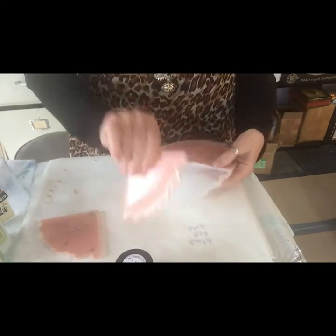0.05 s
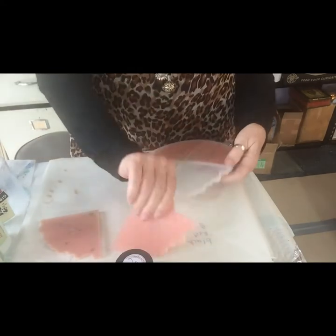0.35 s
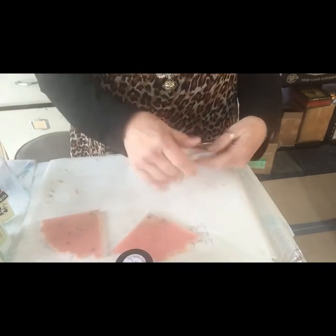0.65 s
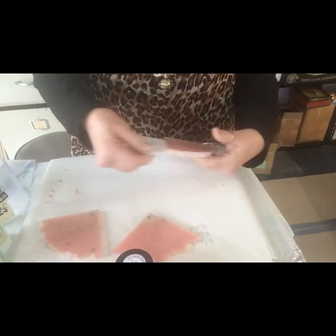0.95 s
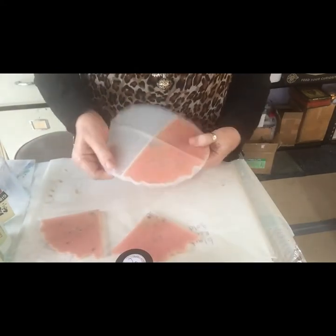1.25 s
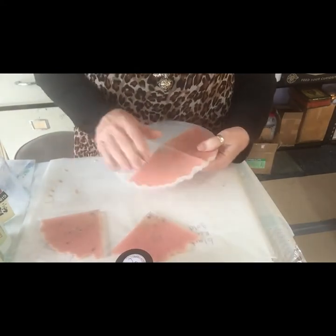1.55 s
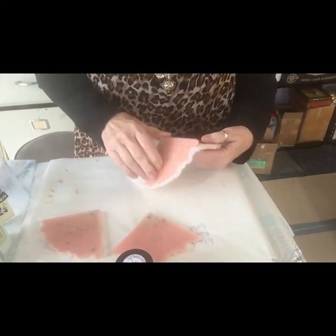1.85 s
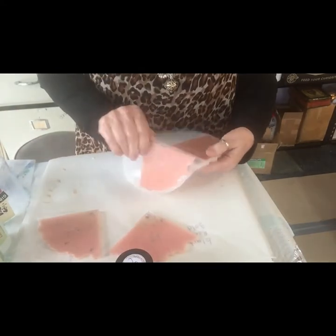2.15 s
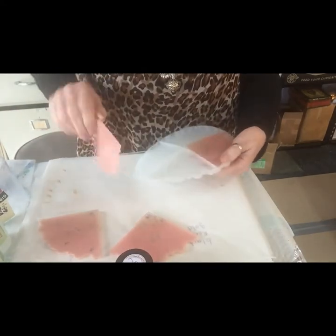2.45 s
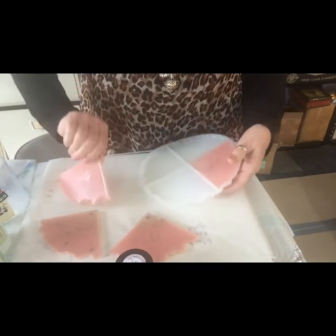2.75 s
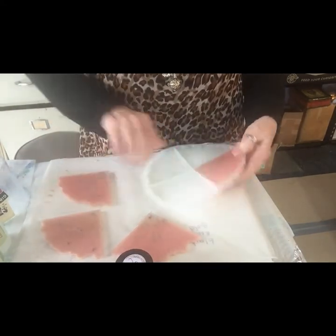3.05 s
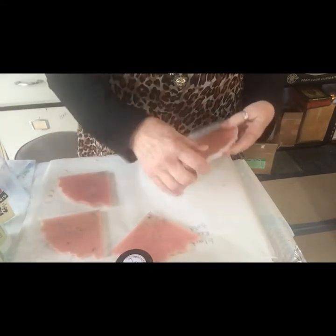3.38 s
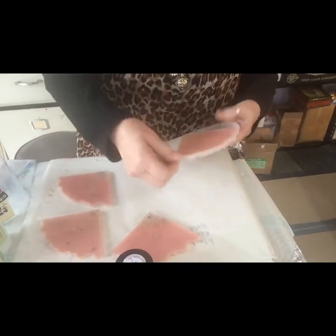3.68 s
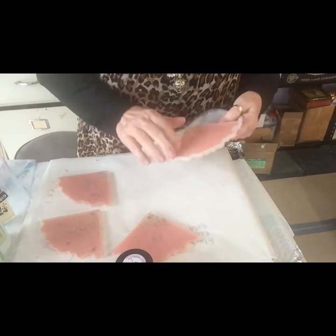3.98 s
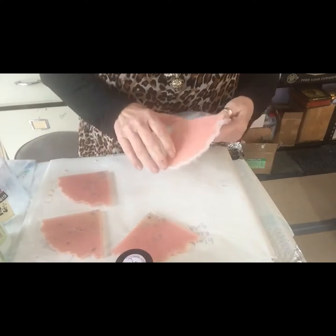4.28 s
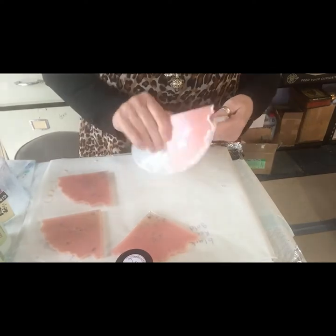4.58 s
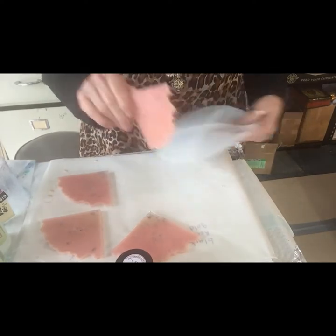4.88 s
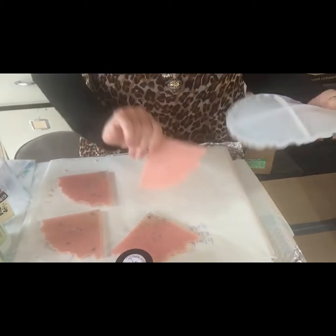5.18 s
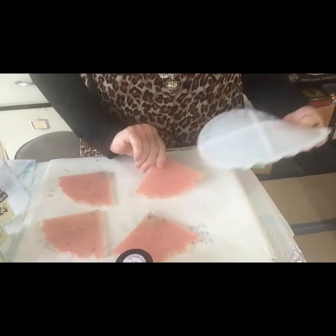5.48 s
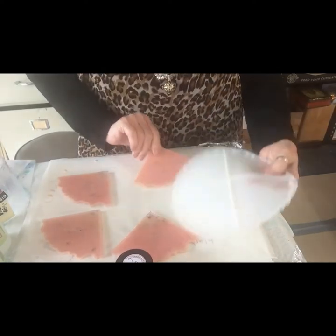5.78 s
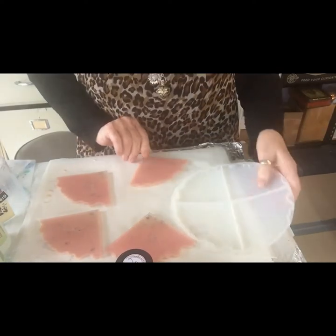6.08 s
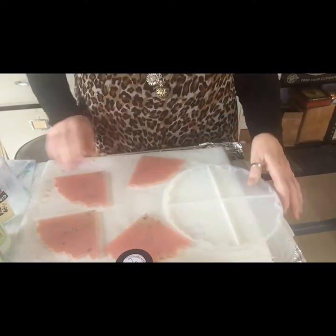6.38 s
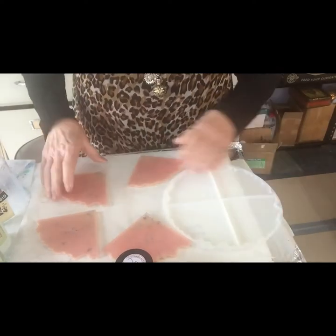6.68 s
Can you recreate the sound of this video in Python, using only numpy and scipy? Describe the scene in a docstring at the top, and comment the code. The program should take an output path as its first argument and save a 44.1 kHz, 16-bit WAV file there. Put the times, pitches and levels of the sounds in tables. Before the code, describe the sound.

A thin hard resin piece drops onto a plastic-covered table with one sharp clack. A silicone mold is flexed with soft crackles and small clicks, and a second piece lands with a lighter clatter. After more faint peeling, a third is set down with a dull knock and slid into place, scraping and clicking. The sounds are close, in a small quiet room with a faint low rumble and hiss.

```python
"""Thin cured resin pieces knock and clack onto a plastic-covered table in a small room.
Each impact excites the damped modes of piece and table top, again and again as the piece rocks to rest.
The silicone mold they are peeled from crackles by stick-slip friction and flops as it lets go.
Slid into place, a piece scrapes, drives the table to a drone and rasps where its edge catches.
A low rumble and a faint hiss lie underneath."""
import sys
import numpy as np
from scipy import signal
from scipy.fft import rfft, irfft, next_fast_len
from scipy.io import wavfile
from scipy.ndimage import map_coordinates

SR = 44100
rng = np.random.default_rng(int(sys.argv[2]) if len(sys.argv) > 2 else 0)


def materialize(psi):
    """Save the field psi as 16-bit PCM at rate SR to the path in sys.argv[1].

    A 1-D psi becomes a single channel; in a 2-D psi each row is a channel.
    """
    bounded = np.clip(np.atleast_2d(psi).T, -1, 1)
    quanta = np.round(bounded * 32767).astype(np.int16)
    wavfile.write(sys.argv[1], SR, quanta)


N = 305613
TIME = np.arange(N) / SR
LIFE = np.arange(SR // 3) / SR  # time since a contact [s]

# course of the room's rumble: (time [s], relative level [dB])
RUMBLE_LEVELS = [(0.6, -77), (2.4, -72.5), (2.49, -69), (6.05, -70.5), (6.35, -76), (6.93, -70)]
# spectrum of the rumble: (frequency [Hz], relative density [dB])
RUMBLE_SPECTRUM = [(15, -41), (25, -3.5), (67, -1), (156, -7), (299, -21), (335, -22), (500, -35),
                   (650, -57.5), (1100, -120)]
# spectrum of the hiss: (frequency [Hz], relative density [dB])
HISS_SPECTRUM = [(150, -26), (250, -6.5), (436, -11), (510, -12), (698, -11), (1450, -13.5), (2620, -16),
                 (2860, -18.5), (5350, -20), (9660, -20.5), (16000, -31.5)]
# strokes of peeling or rubbing: (time [s], duration [s], treble level [dB], body re treble [dB])
RUB_STROKES = [(.02, 0.057, -69.5, 9), (.182, 0.036, -61.5, 6.5), (.284, .11, -63.5, -7),
               (0.391, .04, -51.5, -6.5), (0.817, .125, -58, 1.5), (2.003, .04, -62.5, 0),
               (2.134, .065, -68.5, 0), (2.235, 0.064, -60.5, -1.5), (2.352, .04, -71, 1.5),
               (2.73, .15, -63.5, 7.5), (2.893, .045, -44, 1), (2.96, .15, -58.5, 2.5),
               (3.155, 0.072, -60.5, 2.5), (3.688, .06, -57.5, -1.5), (4.395, .03, -69.5, 3.5),
               (4.66, .1, -72.5, 4), (4.761, .06, -62, 0), (5.671, .15, -74, 9.5), (5.837, .04, -58.5, 6),
               (5.885, .04, -54, 2), (5.926, .016, -45, 2), (5.96, .046, -46.5, -1.5),
               (6.009, .055, -53.5, 2), (6.12, 0.097, -65, 4.5), (6.236, .07, -55, -1)]
# resin rubbing on silicone or plastic: (frequency [Hz], relative density [dB])
SCRAPE_SPECTRUM = [(120, -42.5), (200, -7), (322, -7), (432, -13), (491, -10.5), (590, -13), (780, -9),
                   (950, -12), (1130, -5.5), (1500, -5), (2860, -10.5), (3070, -10.5), (7540, -14),
                   (11100, -10), (16000, -38)]
# clicks of resin edges, nails and parting silicone:
# (time [s], level [dB], body re middle band [dB], treble re middle band [dB], decay t60 [s])
CLICK_EVENTS = [(.0698, -57, -18, -3, 0.011), (0.167, -51, 3, 10, 0.014), (0.1723, -46.5, 11, -40, 0.026),
                (0.3052, -50.5, 7, 9.5, 0.012), (0.388, -53.5, -4, 9, 0.013), (0.761, -45, 6, 1.5, 0.023),
                (0.821, -51, 0, -2, 0.027), (0.8566, -47.5, 3, -13, 0.0068), (0.8857, -45, -2, -3.5, 0.019),
                (.9195, -49, -16, -7, 0.0071), (0.9323, -51.5, 4, -3, 0.012), (1.091, -59, 2, 4, 0.006),
                (2.026, -55.5, 1.5, -1, 0.0073), (2.142, -62.5, 4.5, -7, 0.014),
                (2.229, -62.5, -.5, 1.5, 0.02), (2.2646, -51, 6, 2, 0.03), (2.351, -58.5, 6.5, -6, 0.027),
                (2.7866, -62.5, -13, 12, 0.011), (2.834, -50, 4, 3, 0.048), (3.023, -47.5, 1, -4, 0.015),
                (3.053, -51, 5, -2, 0.0089), (3.107, -56.5, 2, -8, 0.028), (3.133, -51, 1.5, -14, 0.028),
                (3.1518, -45.5, 1, -1, 0.017), (3.184, -54.5, 2.5, 0.5, 0.0094),
                (3.6946, -49, -5, -1, 0.023), (3.7, -55, 4, -2, 0.015), (3.743, -60.5, 0, -3, 0.013),
                (4.014, -65, -15.5, -12, 0.01), (4.361, -68.5, 0.5, 4, 0.015),
                (4.787, -51.5, 2.5, -13, 0.0067), (4.7918, -50.5, 0, -3.5, 0.01),
                (4.835, -56.5, -22.5, 19, 0.0042), (5.773, -48.5, 9, -12, .02),
                (5.846, -49, -6.5, -18, 0.022), (5.8771, -39.5, 1.5, -11.5, 0.02),
                (5.929, -42, 3.5, 5, 0.031), (5.988, -43.5, -7, -2, .018), (6.0413, -51, -7, 3, 0.01),
                (6.05, -45, 2, -9.5, 0.02), (6.195, -54, -3, 7, 0.012), (6.2262, -49.5, -6, -19, 0.015),
                (6.2383, -41, -3, 18.5, 0.0078), (6.3235, -50, 1, -19.5, 0.009),
                (6.727, -54, -2.5, -4, 0.024)]
# thuds of the mold, of fingers and of a piece falling flat: (time [s], level [dB], frequency [Hz])
FLOP_EVENTS = [(0.133, -56.5, 340), (0.279, -57.5, 458), (0.423, -39, 189.8), (0.425, -39, 85.1),
               (0.764, -47.5, 295), (1.352, -64.5, 901), (1.457, -62, 803.6), (2.001, -62.5, 420),
               (2.717, -46, 290), (2.9, -47, 240.7), (3.693, -50.5, 443), (4.747, -61.5, 533),
               (4.791, -58, 260), (4.807, -53.5, 136.6), (5.597, -52.5, 290), (6.052, -50, 360)]
# a piece dragged over the table: (time [s], duration [s], level [dB])
DRAG_STROKES = [(.18, 0.11, -62.5), (.345, 0.096, -52), (5.32, 0.02, -47.5), (5.42, 0.18, -63.5),
                (5.6, 0.017, -56.5), (5.68, 0.12, -57), (6.04, 0.044, -66)]
# the table under a sliding piece: (frequency [Hz], relative density [dB])
DRONE_SPECTRUM = [(100, -25.5), (200, -17), (330, 0.5), (500, -4.5), (670, -11), (850, -1), (1000, -15.5),
                  (1750, -17), (2600, -22), (4600, -29), (8000, -60.5)]
# a piece meets the table: (time [s], resin level [dB], table level [dB], contact cut-off [Hz],
# pitch of the piece [ratio], scuff t60 [s], rocking time [s], loss per corner [dB])
LANDINGS = [(.332, -49.5, -46.5, 1950, 0.7, 0.0078, 0.033, 2),
            (0.411, -46.5, -44, 4060, 0.65, 0.015, 0.0043, 4.5),
            (0.4238, -15, -28, 14300, 0.99, 0.0066, 0.004, 8),
            (2.712, -32.5, -39.5, 1750, .595, 0.016, 0.03, 13.5),
            (2.883, -46, -49, 3290, 0.89, 0.026, 0.0052, 8),
            (2.893, -31.5, -63, 15000, 0.53, 0.086, 0.0067, 7),
            (2.897, -30, -40.5, 9300, 0.7, 0.013, .003, 7.5),
            (2.924, -43.5, -45, 1690, 0.65, 0.031, 0.0051, 12),
            (5.3035, -35.5, -34, 2190, .845, 0.013, 0.0036, 6)]
# spectrum of a bare hard contact: (frequency [Hz], relative density [dB])
CRACK_SPECTRUM = [(100, -14), (500, -2.5), (800, -3), (1100, -8), (2100, 3), (3100, -3), (4000, -2),
                  (5500, 1), (7300, -4.5), (8800, 1.5), (12200, -5), (13500, -15.5), (16000, -19.5)]
# modes of a resin piece of pitch ratio 1: (frequency [Hz], relative level [dB])
RESIN_MODES = [(1680, -13), (1914, 0), (2092, -4), (2430, -7), (2659, -7.5), (3451, -9.5), (4236, -9),
               (5299, 0.5), (5534, -1), (5787, -4), (6088, -7.5), (6412, -7), (6665, -7), (7948, -6),
               (8236, -4.5), (9001, -2), (9220, -3), (9658, -8), (11400, -10)]
# modes of the table top: (frequency [Hz], relative level [dB], decay t60 [s])
TABLE_MODES = [(235, -11, 0.04), (345, -7.5, 0.23), (410, -3, 0.045), (474, -3.5, 0.1), (504, -6, 0.15),
               (552, -9.5, 0.13), (795, -12, 0.05), (1135, -14, 0.09), (1620, -15, .1)]
# a sliding edge catches on the cover: (time [s], duration [s], level [dB], frequency [Hz])
RASP_EVENTS = [(5.886, 0.01, -52, 1120), (5.93, .014, -58, 1130), (5.968, 0.011, -49, 1360),
               (5.983, 0.017, -41.5, 1117)]


def amp(db):
    """Decibels to amplitude ratio."""
    return 10 ** (np.asarray(db) / 20)


def unit(x):
    """Power normalisation to rms 1."""
    return x / np.sqrt(np.mean(x ** 2) + 1e-20)


def unit_hit(x):
    """Energy normalisation to that of 10 ms at rms 1."""
    return x / np.sqrt(np.sum(x ** 2) / (SR / 100) + 1e-20)


def fade(t60):
    """Exponential decay by 60 dB in t60 seconds."""
    return amp(-60 * LIFE / max(t60, 1e-4))


def add(track, s, x):
    """Superposition of x on the track at time s."""
    part = track[max(round(s * SR), 0):][:len(x)]
    part += x[:len(part)]


def filtered(x, response):
    """Linear filtering: the spectrum of x times a frequency response."""
    size = next_fast_len(len(x) + SR // 8)
    return irfft(rfft(x, size) * response(np.fft.rfftfreq(size, 1 / SR)), size)[:len(x)]


def coloured(x, points):
    """Minimum-phase filtering through points of (frequency [Hz], gain [dB])."""
    size = 2 * next_fast_len(len(x) // 2 + SR // 8)
    hz, db = np.transpose(points)
    gain_db = np.interp(np.log(np.fft.rfftfreq(size, 1 / SR) + 1), np.log(hz), db)
    cepstrum = irfft(np.log(amp(gain_db)))
    cepstrum[1:size // 2] *= 2  # folding makes the filter causal
    cepstrum[size // 2 + 1:] = 0
    return irfft(rfft(x, size) * np.exp(rfft(cepstrum)), size)[:len(x)]


def resonance(f, hz, width_hz):
    """Band-pass response of a damped oscillator at the frequencies f."""
    return 1j * f * width_hz / (hz ** 2 - f ** 2 + 1j * f * width_hz)


def echoes(early_db, tail_db, early_t60=0.16, tail_t60=0.22, gap_s=0.0038, bass_hz=170):
    """Diffuse reflection: dense echoes off table and body, then the room's short tail."""
    swell = 1 - np.exp(-(LIFE / gap_s) ** 2)
    early = amp(early_db) * unit_hit(swell * fade(early_t60))
    tail = amp(tail_db) * unit_hit(swell * fade(tail_t60))
    reflections = np.hypot(early, tail) * rng.standard_normal(len(LIFE))
    return filtered(reflections, lambda f: (1j * f / (bass_hz + 1j * f)) ** 2)


def in_room(x, early_db, tail_db):
    """Reverberation: direct sound plus its convolution with the echoes."""
    return x + signal.fftconvolve(x, echoes(early_db, tail_db) / np.sqrt(SR / 100))[:len(x)]


def waver(rate, depth_db):
    """Amplitude modulation: a smooth random gain with rate knots a second."""
    knots = rng.standard_normal(int(N * rate / SR) + 4)
    return amp(depth_db * map_coordinates(knots, [TIME * rate]))


def room_tone():
    """Ambient noise: a wavering low rumble and a faint steady hiss."""
    rumble = coloured(rng.standard_normal(N), RUMBLE_SPECTRUM) * waver(rate=7.5, depth_db=3.0)
    rumble_db = np.interp(TIME, *np.transpose(RUMBLE_LEVELS)) + 3.5
    hiss = coloured(rng.standard_normal(N), HISS_SPECTRUM)
    return amp(rumble_db) * unit(rumble) + amp(-76) * unit(hiss)


def strokes(rows, attack_s=0.01, release_s=0.026, sag_db_per_s=12):
    """Incoherent addition: strokes swell, sag and die away, and their powers sum to one envelope."""
    power = np.zeros(N)
    for s, length, db in rows:
        before, after = np.maximum(s - TIME, 0), np.maximum(TIME - s - length, 0)
        from_middle = np.clip(TIME - s, 0, length) - length / 2
        edges = np.exp(-before / attack_s - after / release_s)
        power += (amp(db - sag_db_per_s * from_middle) * edges) ** 2
    return np.sqrt(power)


def slips(rate, spread_db, hiss):
    """Stick-slip: random uneven pulses over a smooth hiss, equal in power at any rate."""
    pulses = (rng.random(N) < rate / SR) * rng.choice([-1, 1], N)
    sizes = amp(spread_db * np.clip(rng.standard_normal(N), -2, 2))
    return unit(pulses * sizes / np.sqrt(rate)) + hiss * rng.standard_normal(N)


def rubs(crossover_hz=2820, firm_db=-47):
    """Stick-slip friction of peeling and rubbing: a firm stroke slips densely, a light one in grains."""
    treble_gain = strokes([(s, length, db) for s, length, db, _ in RUB_STROKES])
    body_gain = strokes([(s, length, db + body_db) for s, length, db, body_db in RUB_STROKES])
    slips_per_s = 380 + 2000 * treble_gain / amp(firm_db)
    crackle = slips(slips_per_s, spread_db=5.0, hiss=0.65)
    crackle *= waver(rate=60, depth_db=2.5)  # uneven hand pressure
    scrape = unit(in_room(coloured(crackle, SCRAPE_SPECTRUM), early_db=-7.0, tail_db=-6.5))
    body = filtered(scrape, lambda f: 1 / (1 + (f / crossover_hz) ** 4))
    return treble_gain * (scrape - body) + body_gain * body


def snap(t60, rough, rise_s):
    """Rough contact: one impulse, with a burst of micro-contacts building up behind it."""
    burst = rng.standard_normal(len(LIFE)) * fade(t60) * (1 - np.exp(-LIFE / rise_s))
    return unit_hit(LIFE == 0) + rough * unit_hit(burst)


def clicks(body_db_per_octave=39):
    """Impulsive excitation: brief snaps are broadband, and those with less body peak higher."""
    out = np.zeros(N)
    for s, db, body_db, treble_db, t60 in CLICK_EVENTS:
        peak_hz = np.clip(2080 * 2 ** (-body_db / body_db_per_octave), 1500, 4500)
        body = [(130, body_db - 21.5), (350, body_db - 1.5), (560, body_db - 4),
                (820, body_db + 1), (1200, body_db - 2)]
        middle = [(peak_hz, 4), (5500, -4)]
        treble = [(9500, treble_db), (12000, treble_db - 1.5), (15000, treble_db - 21.5)]
        click = coloured(snap(t60, rough=4, rise_s=t60 / 4), body + middle + treble)
        add(out, s, amp(db) * in_room(unit_hit(click), early_db=-10.5, tail_db=-4.0))
    return out


def flops():
    """Heavy damping: a soft contact gives only a few cycles inside a dull puff of air."""
    out = np.zeros(N)
    swell = fade(0.026) * (1 - np.exp(-LIFE / 0.005))
    for s, db, hz in FLOP_EVENTS:
        puff = filtered(swell * rng.standard_normal(len(LIFE)), lambda f: resonance(f, hz, hz) ** 2)
        tone = swell * np.sin(2 * np.pi * hz * LIFE)
        thud = unit_hit(unit_hit(tone) + 1.2 * unit_hit(puff))
        add(out, s, amp(db) * in_room(thud, early_db=-8.0, tail_db=-16.0))
    return out


def drags():
    """Forced vibration: the slips of a dragged piece make the table drone."""
    drone = unit(coloured(slips(rate=470, spread_db=-1.0, hiss=0.99), DRONE_SPECTRUM))
    return strokes(DRAG_STROKES, attack_s=0.014, release_s=0.045, sag_db_per_s=4.5) * drone


def ring(modes):
    """Free vibration: a sum of damped modes whose strengths vary a little from blow to blow."""
    strengths = amp(1.5 * rng.standard_normal(len(modes)))
    return unit_hit(sum((-1) ** k * strengths[k] * amp(db) * fade(t60) * np.sin(2 * np.pi * hz * LIFE)
                        for k, (hz, db, t60) in enumerate(modes)))


def landings(resin_t60=0.16, radiation_hz=230, even_scuff_s=0.0042):
    """Contact stiffness limits an impact's bandwidth: a soft landing knocks, a hard one clacks."""
    out = np.zeros(N)
    for s, resin_db, table_db, cutoff_hz, pitch, scuff_s, rocking_s, loss_db in LANDINGS:
        for corner, delay in enumerate([0, 0.95, 2.95]):  # the piece rocks onto three corners in turn
            # a scuff lasting even_scuff_s carries as much energy as the first pulse
            strike = unit_hit(snap(scuff_s, rough=scuff_s / even_scuff_s, rise_s=0.0003))
            reflections = echoes(early_db=-7.5, tail_db=-6.0, early_t60=0.06, tail_t60=0.23)
            crack = unit_hit(coloured(strike + reflections, CRACK_SPECTRUM))
            clack = crack + amp(-8) * ring([(hz * pitch, db, resin_t60) for hz, db in RESIN_MODES])
            # contact and plastic cover are damped springs that pass little above their own frequency
            clack = filtered(clack, lambda f: 1 / (1 - (f / cutoff_hz) ** 2 + 1.1j * f / cutoff_hz) ** 2)
            resin = unit_hit(clack) + amp(-14) * crack  # a faint edge tick gets through
            # the table top radiates little bass
            table = filtered(ring(TABLE_MODES), lambda f: 1j * f / (radiation_hz + 1j * f))
            contact = amp(resin_db) * resin + amp(table_db) * in_room(table, early_db=-12.5, tail_db=-10)
            add(out, s + delay * rocking_s, amp(-loss_db * corner) * contact)
    return out


def rasps(width_hz=57, overtone_ratio=2.55, attack_s=0.0043, release_s=0.0069):
    """Resonance: quick slips of a catching edge ring the piece, at a pitch that differs with each grip."""
    out = np.zeros(N)
    for s, length, db, hz in RASP_EVENTS:
        grip = (1 - np.exp(-LIFE / attack_s)) * np.exp(-np.maximum(LIFE - length, 0) / release_s)
        catches = grip * slips(rate=1500, spread_db=4.0, hiss=0.3)[:len(LIFE)]
        low = filtered(catches, lambda f: resonance(f, hz, width_hz))
        high = filtered(catches, lambda f: resonance(f, hz * overtone_ratio, width_hz * overtone_ratio))
        add(out, s, amp(db) * (unit_hit(low) + amp(-4) * unit_hit(high)))
    return out


def scene():
    """Superposition of all sources at one point above the table."""
    return (room_tone() + rubs() + clicks() + flops() + drags() + landings() + rasps())[None]


def record(dry, bass_hz=42, top_hz=15900):
    """Band limiting: the deepest bass is cut, peaks clip at full scale and the top treble is removed."""
    highpass = signal.butter(4, bass_hz, "highpass", fs=SR, output="sos")
    clipped = np.clip(signal.sosfilt(highpass, dry[0]), -1, 1)
    return filtered(clipped, lambda f: np.clip((top_hz - f) / 400, 0, 1))[None]


dry = scene()
out = record(dry)
materialize(out)
```